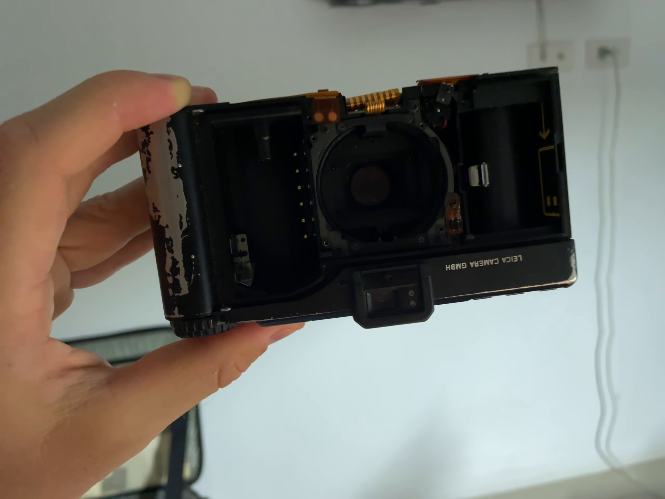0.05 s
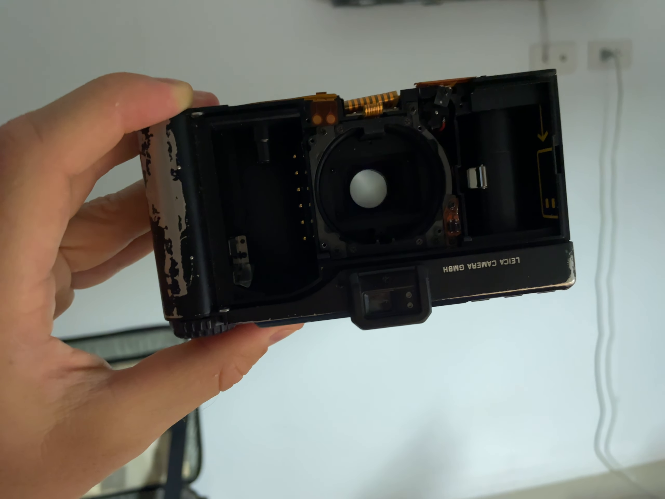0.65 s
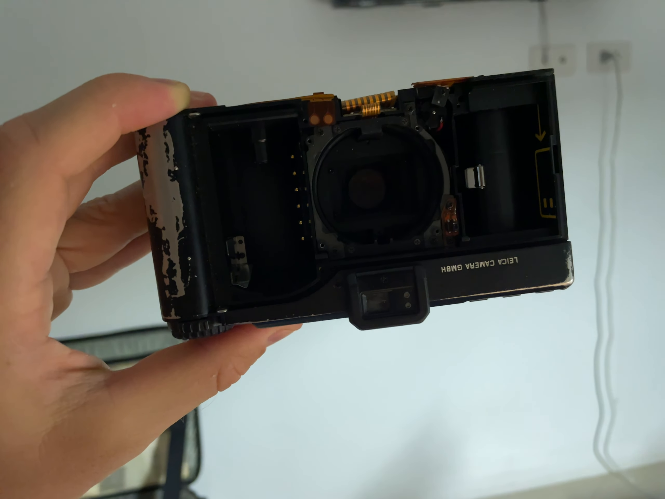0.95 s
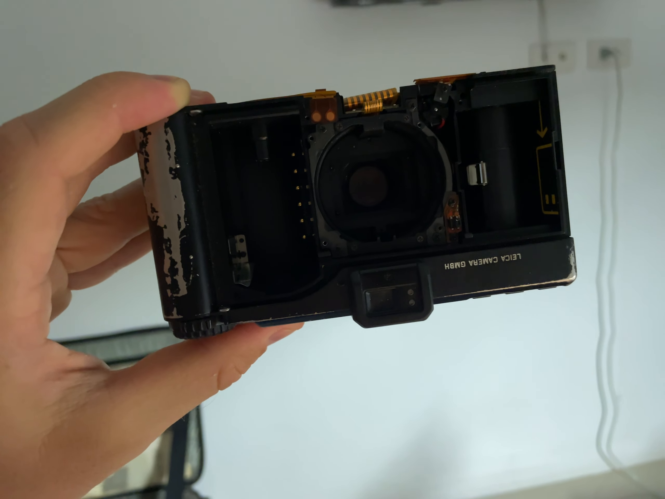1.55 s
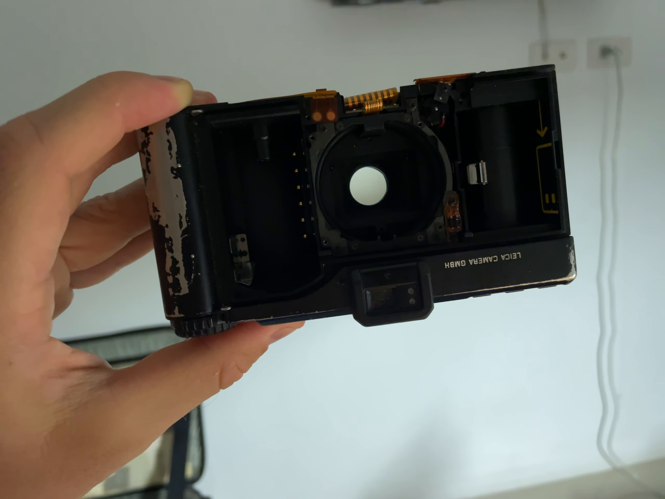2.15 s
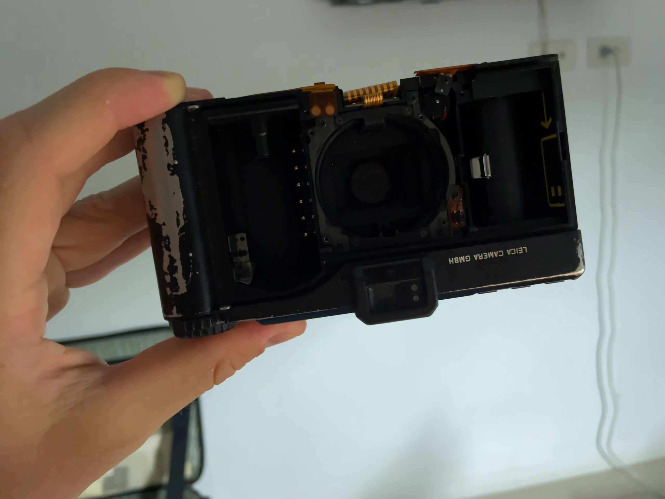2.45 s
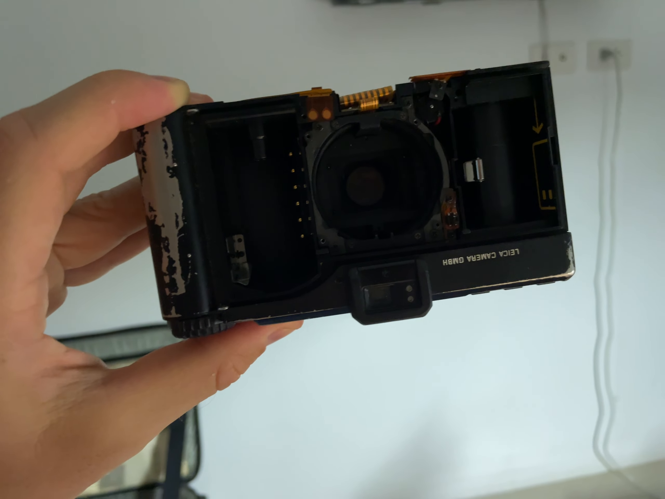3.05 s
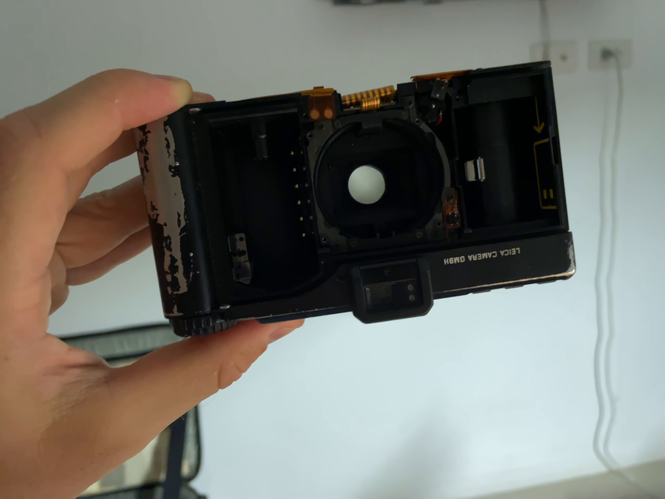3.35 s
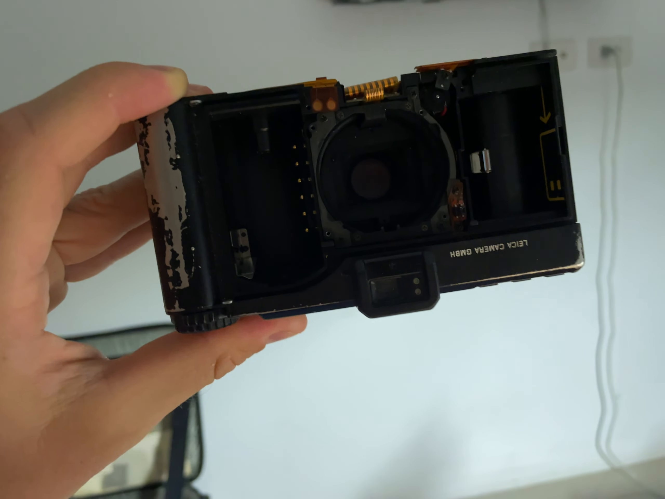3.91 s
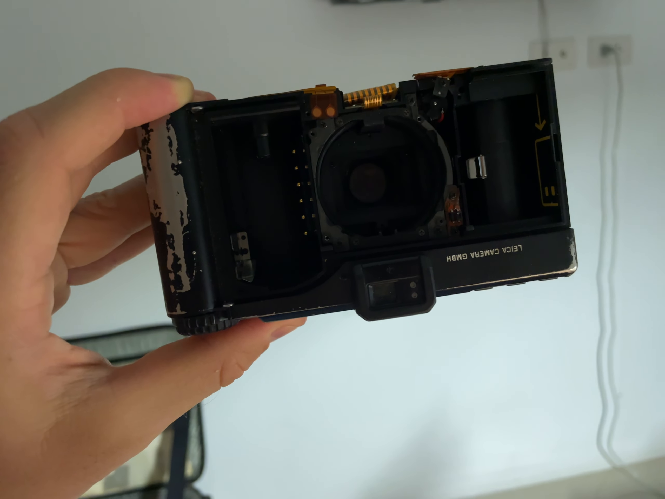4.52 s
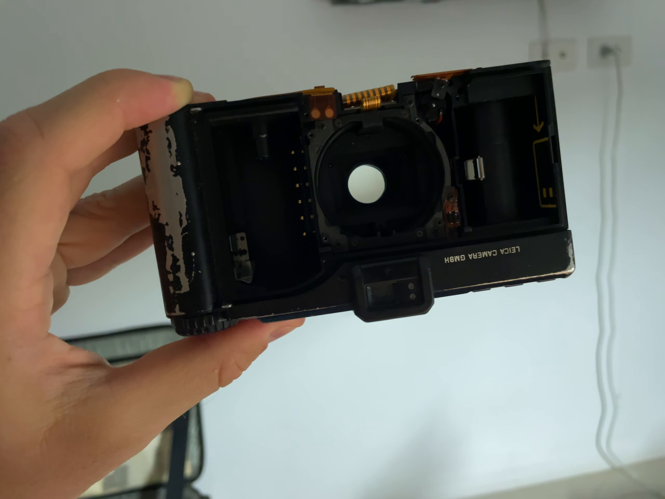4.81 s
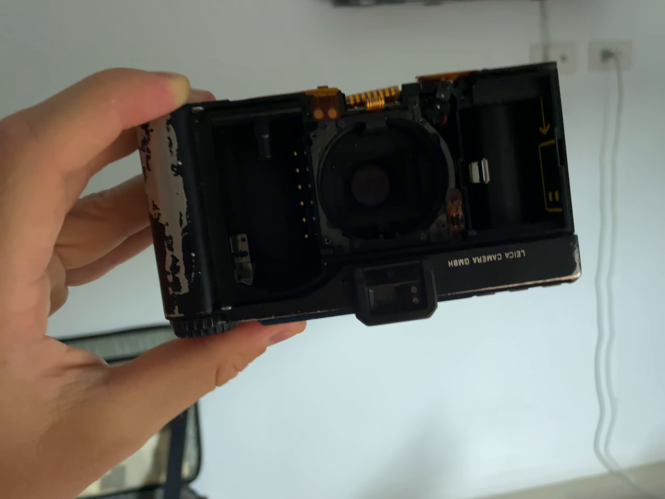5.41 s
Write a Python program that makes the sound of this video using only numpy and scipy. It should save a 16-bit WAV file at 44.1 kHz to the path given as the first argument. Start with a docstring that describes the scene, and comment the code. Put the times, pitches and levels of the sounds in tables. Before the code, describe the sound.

A compact film camera fires four evenly spaced shots in a quiet room, each with short lens motor whines and a chattering shutter.

```python
"""The geared lens motor of a compact film camera whines and rattles through four shots in a quiet room.
In each shot a switch ticks, the motor drives the lens out, the shutter chatters open and snaps shut,
the lens winds back and something rubs softly. The whine lies at the tooth-meshing frequency; ticks and
chatter are impacts filtered by the camera body. The room reverberates over rumble and a faint hum."""
import sys
import numpy as np
from scipy import signal
from scipy.fft import rfft, irfft
from scipy.io import wavfile

SR = 44100
rng = np.random.default_rng(int(sys.argv[2]) if len(sys.argv) > 2 else 0)


def generate_wav(signal):
    """Clip the signal to [-1, 1] and save it as 16-bit WAV at the path in sys.argv[1]."""
    frames = np.transpose(np.atleast_2d(signal))
    scaled = np.clip(frames, -1, 1) * 32767
    pcm = np.round(scaled).astype(np.int16)
    wavfile.write(sys.argv[1], SR, pcm)


N = 245637
LEAD = SR // 2  # samples by which tracks begin before t = 0


def lens(out_times, back_times):
    """Gear noise depends on load: the lens runs out slowed, and back more freely on the other flank."""
    # impacts as the gears take up their slack: t/s after the start, level/dB, swell/s
    slack_out = [(.0239, -38, .0004), (.0294, -33, .0004)]
    slack_back = [(.0224, -38, .0004)]
    # radiation of the body in each direction of travel: f/Hz, level/dB
    out_colour = [(250, -26.5), (480, -27.5), (850, -7), (1400, -13), (2700, 3), (3600, -7), (4500, -1.5),
                  (5500, -6.5), (6800, 1), (11100, -6), (11600, -6.5), (12900, -14), (13600, 1.5),
                  (15500, -3.5)]
    back_colour = [(250, -42), (550, -37), (1000, -18.5), (1800, -16.5), (2700, -5), (3650, -12.5),
                   (4300, -5.5), (5100, -11.5), (6300, -1.5), (9800, -11.5), (12900, -14), (13700, -3.5),
                   (14800, -15), (15500, -2.5)]
    run_out = motor(free_hz=2760, crawl_hz=680, cut_s=.136, brake_s=.02, stop_s=.226,
                    load_s=.079, load_share=.145, load_db=-3, gear_db=-35.2, coast_db=-5.2,
                    whine_db=-34.8, slack_db=-16, end_stop_db=-1, coast_whine_db=-14, whine_fall_s=.004)
    run_back = motor(free_hz=2985, crawl_hz=1100, cut_s=.125, brake_s=.012, stop_s=.197,
                     load_s=.092, load_share=.008, load_db=-2.5, gear_db=-31.4, coast_db=-15,
                     whine_db=-40.8, slack_db=-20, end_stop_db=7, coast_whine_db=-20, whine_fall_s=.028)
    outward = knocks(out_times, slack_out, gain_db=1, ring_s=.0018, grit_db=3)
    backward = knocks(back_times, slack_back, gain_db=0, ring_s=.0015, grit_db=3)
    tones = np.zeros(LEAD + N)
    front_flank, rear_flank = tooth_flaws(), tooth_flaws()
    for start in out_times:
        clatter, whine = gears(run_out, front_flank, lash_db=4.9, second_db=-23, third_db=-13,
                               idler_db=-27, idler_ratio=.385, flutter_db=1.8)
        add(outward, start, clatter)
        add(tones, start, whine)
    for start in back_times:
        clatter, whine = gears(run_back, rear_flank, lash_db=1.5, second_db=-8.5, third_db=-18,
                               idler_db=-30, idler_ratio=.345, flutter_db=2.8)
        add(backward, start, clatter)
        add(tones, start, whine)
        add(tones, start, barrel(centre_hz=4320, width_hz=240, gain_db=-.5))
    radiated = body(outward, out_colour) + body(backward, back_colour)
    return shell(radiated, ring_s=.003, ring_db=-7) + tones


def motor(free_hz, crawl_hz, cut_s, brake_s, stop_s, load_s, load_share, load_db,
          gear_db, coast_db, whine_db, slack_db, end_stop_db, coast_whine_db, whine_fall_s):
    """Inertia smooths spin-up, sag under load and braking. Returns mesh f/Hz, clatter/dB, whine/dB."""
    stick_s, take_up_s, strain_s, halt_s = .004, .03, .024, .015
    engage_hz, engage_width_hz, db_per_octave = 2253, 190, 5.5
    t = np.arange(1, int(stop_s * SR)) / SR
    powered, coasting = np.minimum(t, cut_s), t - cut_s
    load = settle(powered - load_s, time_s=.026)
    driven_hz = free_hz * settle(powered - stick_s, time_s=.0255) * (1 - load_share * load)
    mesh_hz = 1 + driven_hz + (crawl_hz - driven_hz) * settle(coasting, brake_s)
    speed_db = db_per_octave * np.log2(mesh_hz / free_hz)
    fade = np.minimum(np.minimum(t / take_up_s, (stop_s - t) / halt_s), 1)
    # the load presses the teeth together and quiets them
    running_db = speed_db + load_db * load + 20 * np.log10(fade)
    # near engage_hz the teeth seat and the whine comes out
    slack = .5 - .5 * np.tanh((driven_hz - engage_hz) / engage_width_hz)
    strain = np.exp(-((coasting + strain_s / 2) / strain_s) ** 2)  # against the end stop
    clatter_level = gear_db + running_db + coast_db * settle(coasting, time_s=.015)
    whine_level = whine_db + running_db + coast_whine_db * settle(coasting, whine_fall_s)
    return mesh_hz, clatter_level, whine_level + slack_db * slack + end_stop_db * strain


def gears(run, flaws, lash_db, second_db, third_db, idler_db, idler_ratio, flutter_db, pinion_teeth=9):
    """Periodic tooth contact whines, flaws repeat each turn as a buzz, and backlash rattles."""
    mesh_hz, clatter_db, whine_db = run
    buzz_db, rattle_db = -6, -1.5
    n = len(mesh_hz)
    # at speed the teeth stay engaged; starting and coasting, they chatter in their play
    play = np.interp(mesh_hz, [1000, 1750, 2300], [.24, .13, .006])
    teeth_passed = np.cumsum(mesh_hz * (1 + play * wander(n, rate=900))) / SR
    surface = np.interp(teeth_passed / pinion_teeth, np.arange(len(flaws)) / len(flaws), flaws, period=1)
    buzz = surface * mesh_hz / mesh_hz.max()
    phase = 2 * np.pi * teeth_passed
    spurts = grit(n, spread_db=3.8) * undb(lash_db * wander(n, rate=630))
    rattle = unit(spurts * (1 + .5 * np.cos(phase)))  # strongest as each tooth engages
    clatter = undb(clatter_db) * (undb(buzz_db) * buzz + undb(rattle_db) * rattle)
    whine = np.sin(phase) + undb(second_db) * np.sin(2 * phase) + undb(third_db) * np.sin(3 * phase)
    whine += undb(idler_db) * np.sin(idler_ratio * phase)  # the next gear meshes more slowly
    whine *= np.sqrt(2) * undb(whine_db + flutter_db * wander(n, rate=259))
    return clatter, whine


def tooth_flaws(harmonics=54, size=2048):
    """The uneven surface over one turn of the pinion, as a Fourier series of random phases, rms 1."""
    phases = 2 * np.pi * rng.random(harmonics)
    return unit(irfft(np.r_[0, np.exp(1j * phases)], size))


def barrel(centre_hz, width_hz, gain_db):
    """Sliding friction excites one resonance of the returning lens barrel."""
    # envelope of the rasp: t/s after the start, level/dB
    rasp = [(.02, -70), (.034, -46), (.062, -43), (.08, -47), (.115, -65)]
    times, db = np.transpose(rasp)
    t = np.arange(int(times[-1] * SR)) / SR
    resonator = signal.iirpeak(centre_hz, centre_hz / width_hz, fs=SR)
    ring = signal.lfilter(*resonator, grit(len(t), spread_db=3.8))
    return unit(ring) * undb(np.interp(t, times, db) + gain_db)


def shutter(open_times, close_times):
    """Impact trains excite the body: the blades are stepped open, then drop shut in a shorter chatter."""
    # paired blade impacts: t/s, level/dB, swell/s, gap to the second/s, its relative level/dB
    blades_open = [(.068, -47, 0.00024, .0023, 6), (.0892, -29.5, 0.0012, 0.006, -2.5),
                   (.1163, -31.5, .0005, 0.0057, -3.5), (.1232, -40.5, .0013, .0028, 4),
                   (.1431, -39.5, .0008, .003, -18)]
    blades_close = [(.003, -32.5, .0007, .0059, -2.5), (.0129, -32.5, 0.0009, 0.0031, -1.5),
                    (.0263, -32, .0005, .0042, -5), (.0358, -35.5, .0013, .0038, 4)]
    # radiation of the shutter through the body: f/Hz, level/dB
    colour = [(250, -29), (480, -40.5), (750, -12), (1100, -15), (1550, -5), (1900, -9.5), (2500, -3),
              (3400, -9), (6000, -5), (6400, -3.5), (7900, -5), (8800, -12), (9800, -0.5), (15500, -5.5)]
    # even steps of the drive, growing louder: same columns as the blades
    steps = [(.0022 + k * .0082, -36.5 + k * .64, .0015, .0029, -5) for k in range(7)]
    opening = knocks(open_times, strikes(steps + blades_open), gain_db=1.28, ring_s=.0019, grit_db=.5)
    closing = knocks(close_times, strikes(blades_close), gain_db=1, ring_s=.0019, grit_db=3.5)
    return body(opening + closing, colour)


def strikes(pairs):
    """Each double impact unfolds into two knocks: t/s, level/dB, swell/s."""
    train = []
    for at, db, swell_s, gap_s, again_db in pairs:
        train += [(at, db, swell_s), (at + gap_s, db + again_db, swell_s)]
    return train


def switch():
    """A single, quickly damped impact makes each tick of the switch."""
    # onsets of the ticks: t/s
    ticks = [.1654, 1.517, 2.8182, 4.1853, 5.5102]
    # the impact: t/s after the onset, level/dB, swell/s
    impact = [(.0035, -44, .0003)]
    # radiation of the switch through the body: f/Hz, level/dB
    colour = [(250, -36), (500, -19), (1500, -4), (2900, -1.5), (4500, -9), (5200, -3), (6800, -11),
              (7900, -1), (9300, -3.5), (10000, -20), (11200, -9), (15500, -23)]
    return body(knocks(ticks, impact, gain_db=.5, ring_s=.0015, grit_db=6.5), colour)


def rub(back_times):
    """Friction in the hand-held body gives a soft scuff after each shot."""
    # scuffs: t/s after the lens starts back, level/dB, swell/s
    scuffs = [(.332, -64, .002), (.344, -59, .004), (.357, -69, .003)]
    # radiation of the rubbing: f/Hz, level/dB
    colour = [(250, -19), (600, -18), (1500, -9.5), (3000, -11), (4000, -12), (6300, -15.5), (9000, -23),
              (11000, -19), (13000, -33), (15500, -39)]
    return body(knocks(back_times, scuffs, gain_db=0, ring_s=.008, grit_db=3), colour)


def knocks(times, train, gain_db, ring_s, grit_db):
    """Impacts superpose: one train repeats at each start, with random scatter in time and force."""
    scatter_s, scatter_db = .0001, 1.1
    track = np.zeros(LEAD + N)
    for start in times:
        for at, db, swell_s in train:
            slip, force = rng.standard_normal(2)
            sound = knock(db + gain_db + scatter_db * force, swell_s, ring_s, grit_db)
            add(track, start + at - 2 * swell_s + scatter_s * slip, sound)
    return track


def knock(db, swell_s, ring_s, grit_db):
    """A small part scrapes up to its stop for two swell times, hits it and decays exponentially."""
    t = np.arange(SR // 30) / SR - 2 * swell_s
    envelope = np.exp(np.minimum(t, 0) / swell_s - np.maximum(t, 0) / ring_s)
    return undb(db) * envelope * grit(len(t), grit_db)


def body(x, colour, size=1024):
    """A radiating body acts as a minimum-phase filter of unit energy; colour lists f/Hz, level/dB."""
    hz, db = np.transpose(colour)
    log_f = np.log(np.fft.rfftfreq(size, 1 / SR) + 1)
    gain = undb(np.interp(log_f, np.log(hz), db))
    # folding the cepstrum onto positive time makes the response causal
    cepstrum = irfft(np.log(gain))
    cepstrum[1:size // 2] *= 2
    cepstrum[size // 2 + 1:] = 0
    response = irfft(np.exp(rfft(cepstrum)))
    return signal.fftconvolve(x, response / np.linalg.norm(response))[:len(x)]


def shell(x, ring_s, ring_db):
    """Modal overlap: the many close modes of the plastic shell ring as a brief decay of noise."""
    t = np.arange(SR // 50) / SR
    ring = rng.standard_normal(len(t)) * np.exp(-t / ring_s)
    ring *= undb(ring_db) / np.linalg.norm(ring)
    ring[0] += 1  # direct sound
    return signal.fftconvolve(x, ring / np.linalg.norm(ring))[:len(x)]


def room(x):
    """A diffuse field decays exponentially in each band, here most slowly near the gear whine."""
    # reverberation: f/Hz, level/dB, time to fall 60 dB/s
    bands = [(484, -7.5, 0.2), (1450, -8, 0.25), (2546, -14, 0.45), (2944, -7.5, 0.56), (3704, -12, 0.3),
             (6000, -13.5, 0.4), (9900, -16.5, 0.3), (16000, -19.5, 0.41)]
    hz, db, t60 = np.transpose(bands)
    t = np.arange(SR * 3 // 4) / SR
    build_up = np.clip(t / .006, 0, 1)
    spectrum = rfft(rng.standard_normal(len(t)))
    log_f = np.log(np.fft.rfftfreq(len(t), 1 / SR) + 1)
    response = 0
    for share, level_db, decay_s in zip(np.eye(len(hz)), db, t60):
        fade = np.exp(-np.log(1000) * t / decay_s) * build_up
        band = irfft(spectrum * np.interp(log_f, np.log(hz), share), len(t))
        response += undb(level_db) * band * fade / np.linalg.norm(fade)
    return signal.fftconvolve(x, response)[:len(x)]


def background(air_db=-71.5, hum_hz=49.2):
    """The noise floor: broadband rumble and thin hiss, with a pure low hum that fades away."""
    # spectrum of still air and building rumble: f/Hz, level/dB
    air_colour = [(28, -51.5), (40, -27), (52, -13), (75, 0.5), (130, -2.5), (230, -8), (450, -15.5),
                  (1000, -23.5), (3000, -30), (3450, -16.5), (3900, -33), (12000, -33), (13700, -59),
                  (16000, -48.5)]
    # envelope of the hum: t/s, level/dB
    hum_fade = [(0, -71), (3, -71), (4.2, -81), (5.5, -106)]
    t = np.arange(N) / SR
    noise = body(rng.standard_normal(LEAD + N), air_colour, size=16384)[LEAD:]
    air = unit(noise) * undb(air_db + .4 * wander(N, rate=4.2))
    hum_db = np.interp(t, *np.transpose(hum_fade))
    return air + np.sqrt(2) * np.sin(2 * np.pi * hum_hz * t) * undb(hum_db)


def grit(n, spread_db):
    """Tiny contacts of log-normal strength make a rough noise, rms 1."""
    return unit(rng.standard_normal(n) * undb(spread_db * rng.standard_normal(n)))


def wander(n, rate):
    """Random modulation of spread near 1, with `rate` new values a second."""
    at = np.arange(n) / SR * rate
    return np.interp(at, np.arange(2048), rng.standard_normal(2048))


def settle(t, time_s):
    """First-order step response: a rise from 0 towards 1 once t is positive."""
    return 1 - np.exp(-np.maximum(t, 0) / time_s)


def undb(db):
    """Decibels to amplitude ratio."""
    return 10 ** (np.asarray(db) / 20)


def unit(x):
    """Scale to rms 1."""
    return x / np.sqrt(np.mean(x ** 2))


def add(track, start_s, sound):
    """Superpose a sound on a track that begins LEAD samples early."""
    i = LEAD + int(start_s * SR)
    part = sound[:max(len(track) - i, 0)]
    track[i:i + len(part)] += part


def scene(count=4, first_s=.2602, every_s=1.3457):
    """The camera's direct sound, its reverberation and the noise floor add at a close microphone."""
    open_s, close_s, back_s = .2864, .6677, .7995  # after the lens starts out
    shots = first_s + every_s * np.arange(count)
    backs = [-.286, *(shots + back_s)]  # one return precedes t = 0, and the room still rings with it
    camera = switch() + lens(shots, backs) + shutter(shots + open_s, shots + close_s) + rub(backs)
    return ((camera + room(camera))[LEAD:] + background())[None]


def record(dry, top_hz=15850):
    """Band limiting: an elliptic low-pass cuts the top steeply."""
    return signal.sosfilt(signal.ellip(10, .2, 70, top_hz, fs=SR, output="sos"), dry)


dry = scene()
out = record(dry)
generate_wav(out)
```